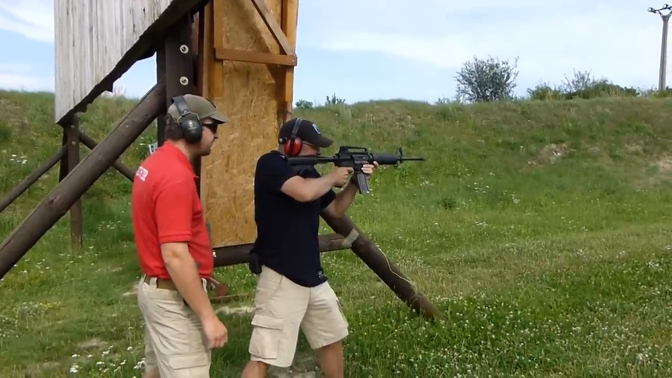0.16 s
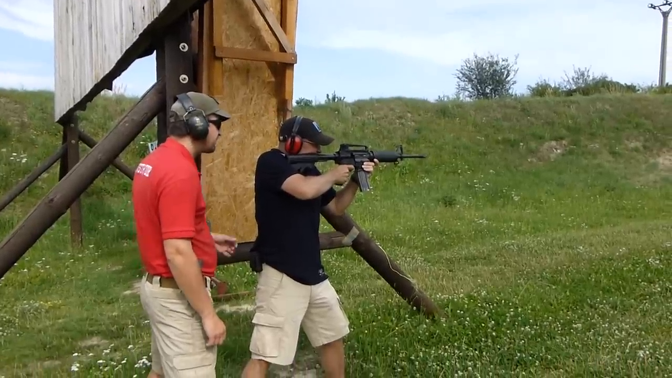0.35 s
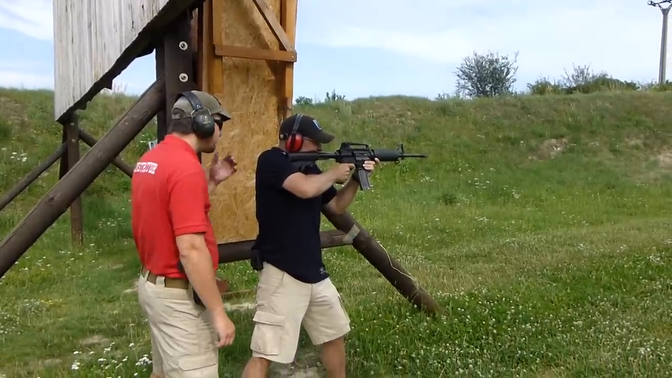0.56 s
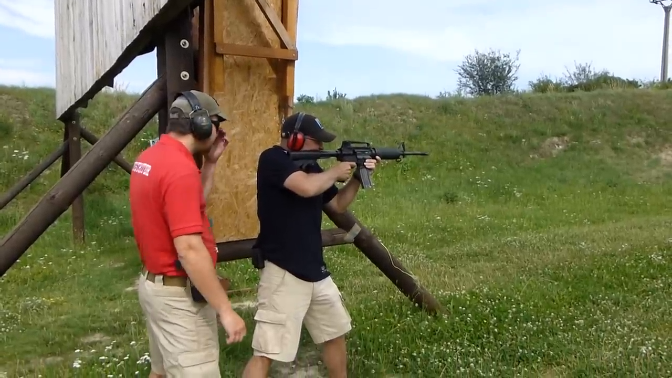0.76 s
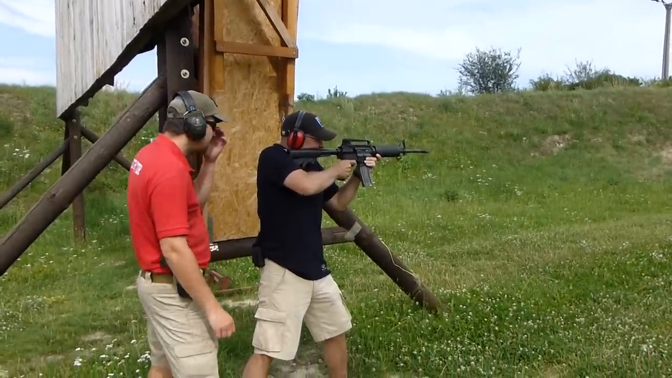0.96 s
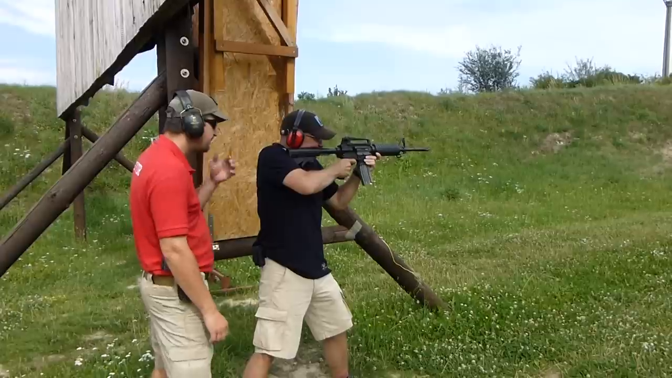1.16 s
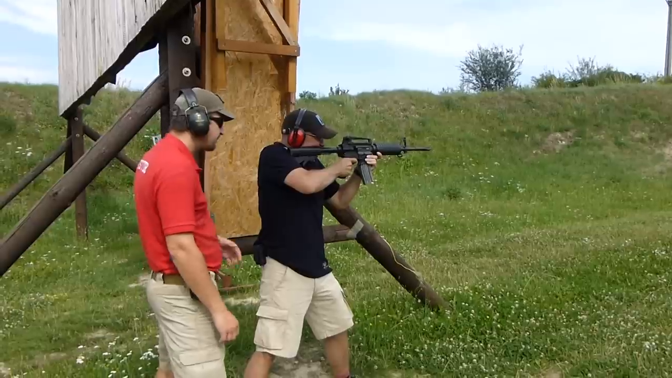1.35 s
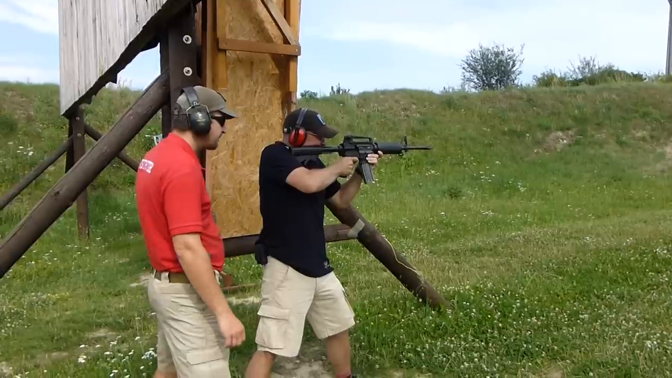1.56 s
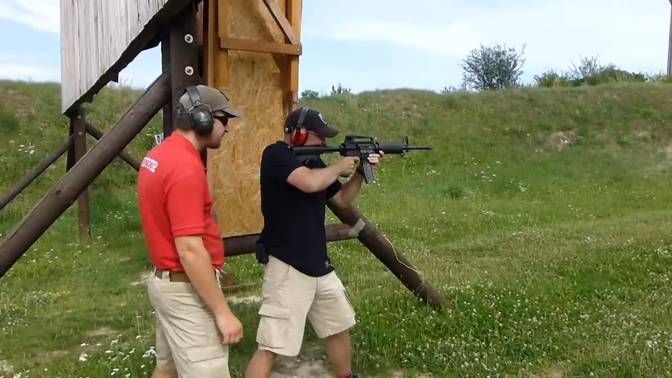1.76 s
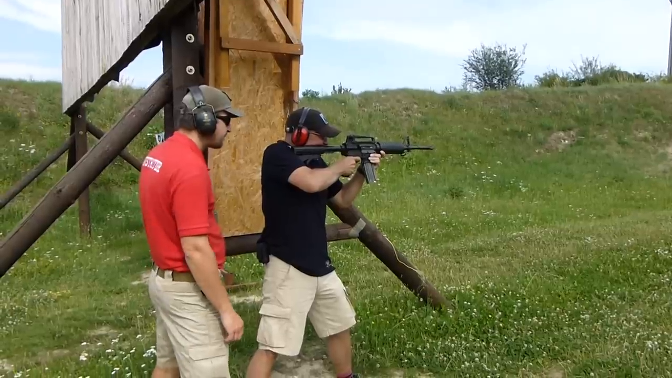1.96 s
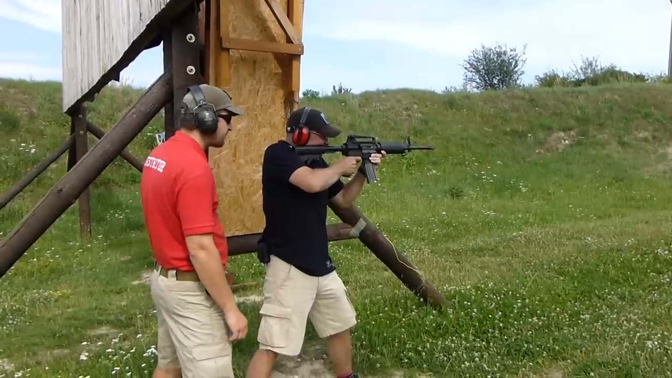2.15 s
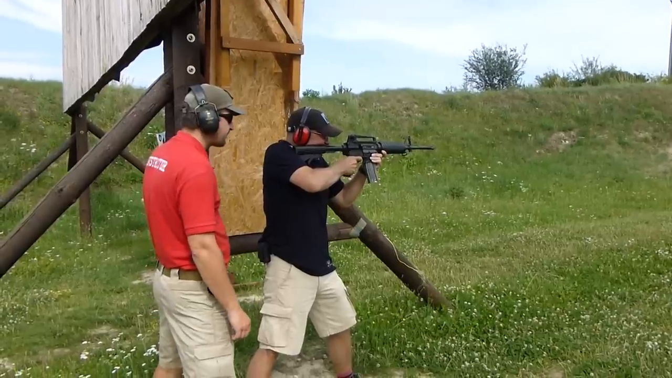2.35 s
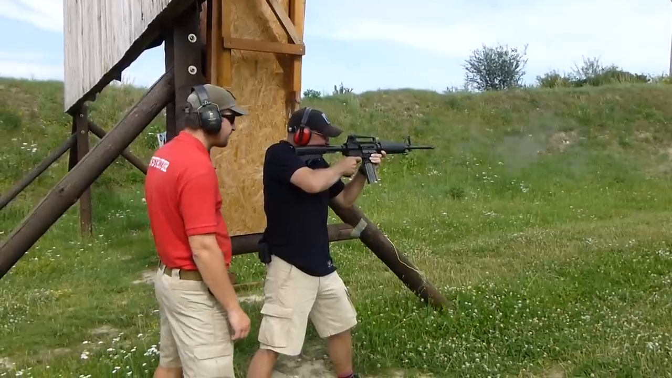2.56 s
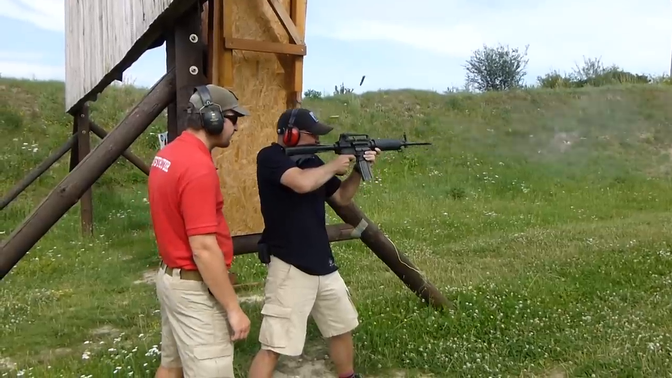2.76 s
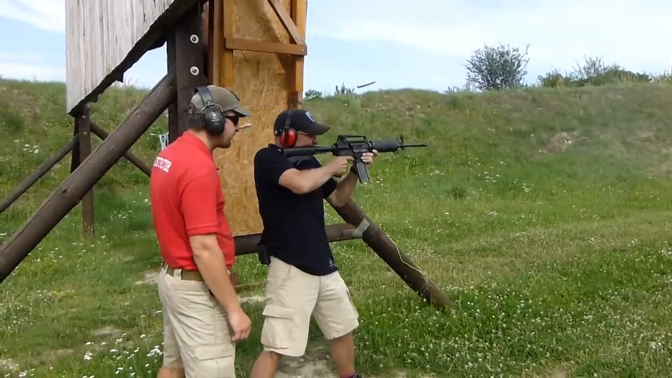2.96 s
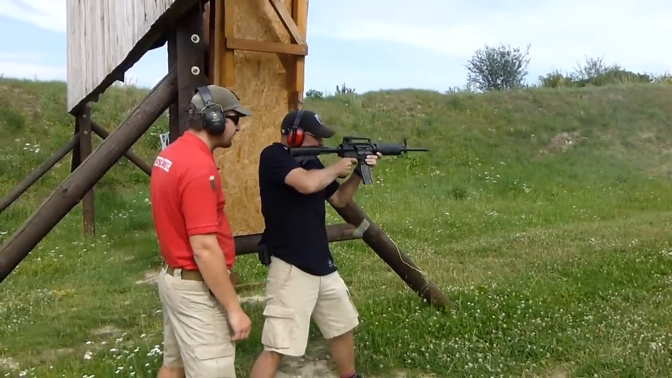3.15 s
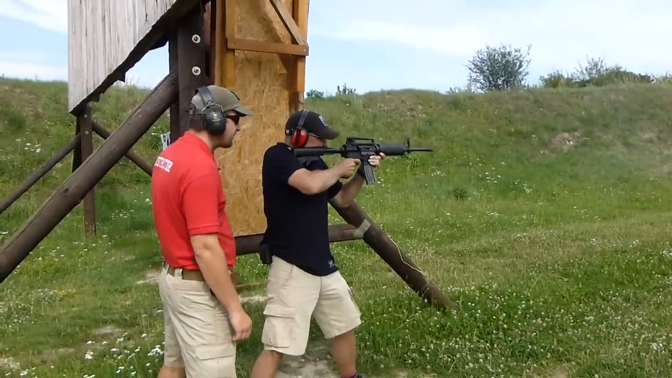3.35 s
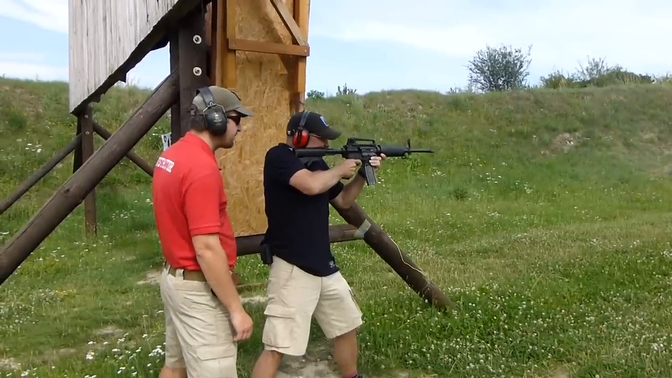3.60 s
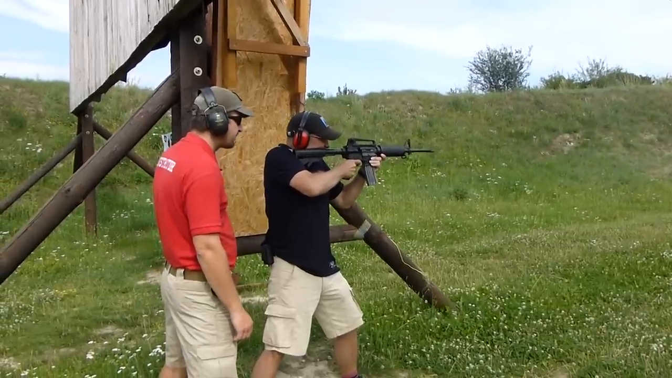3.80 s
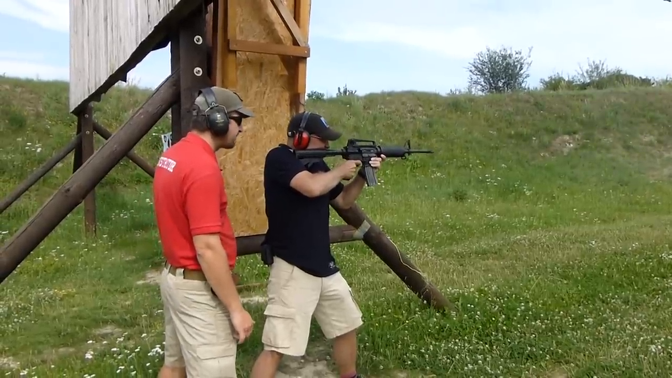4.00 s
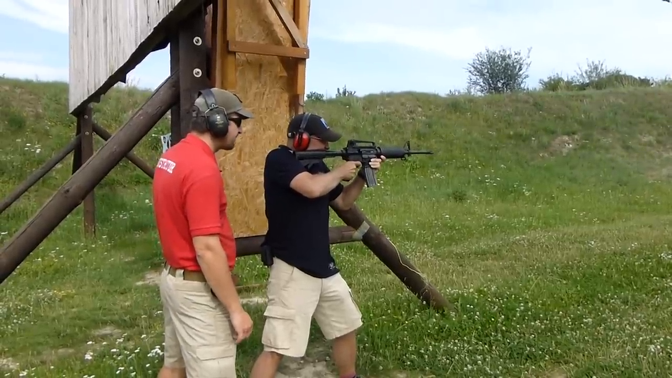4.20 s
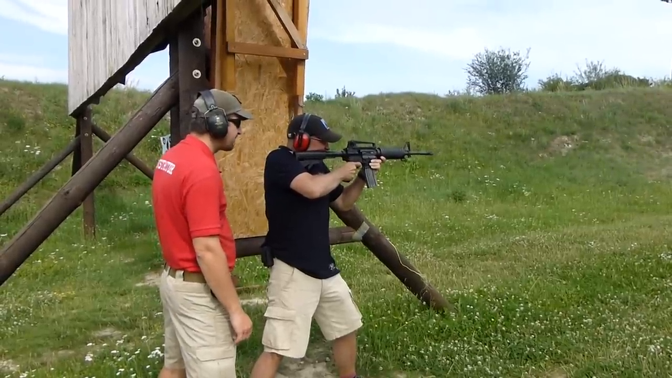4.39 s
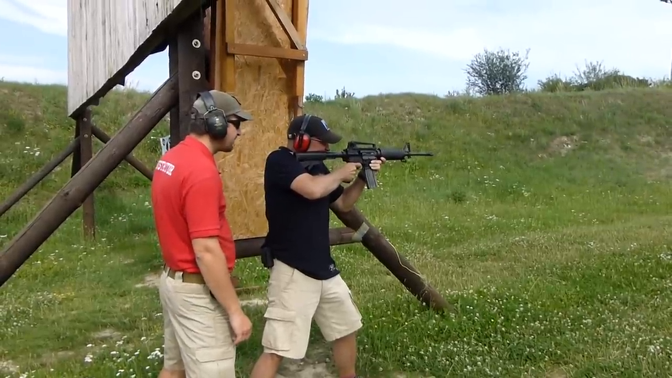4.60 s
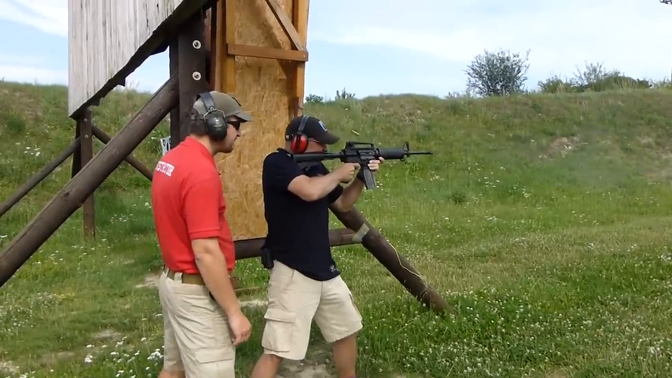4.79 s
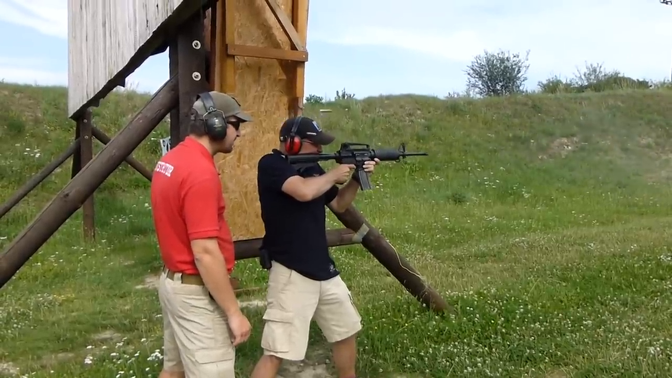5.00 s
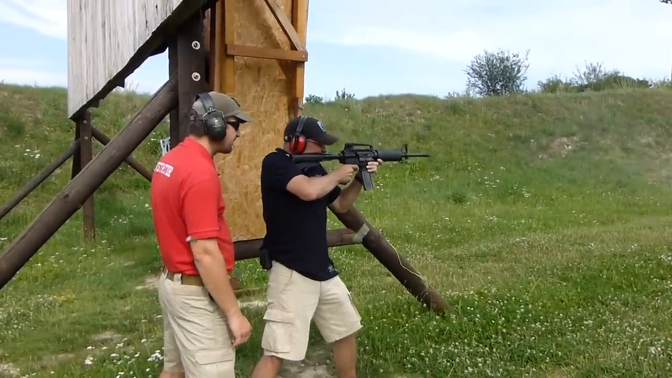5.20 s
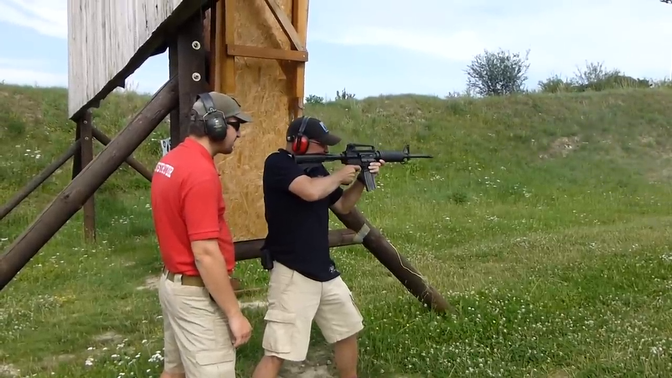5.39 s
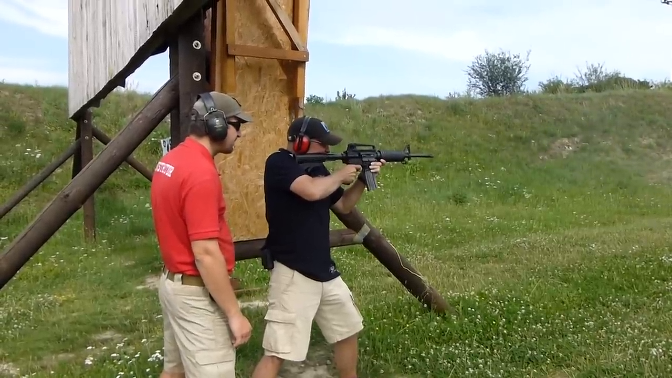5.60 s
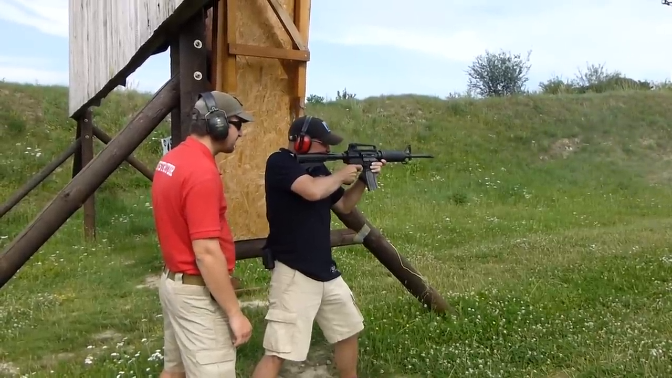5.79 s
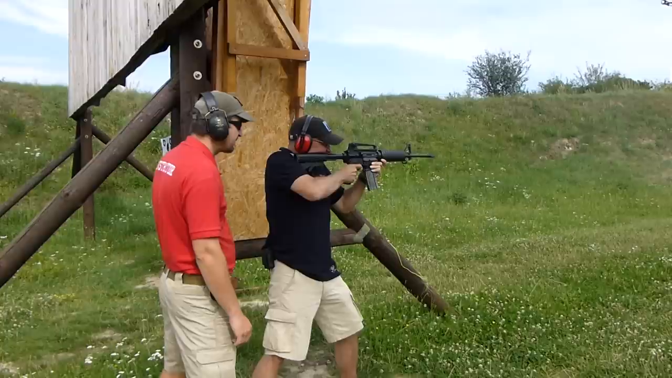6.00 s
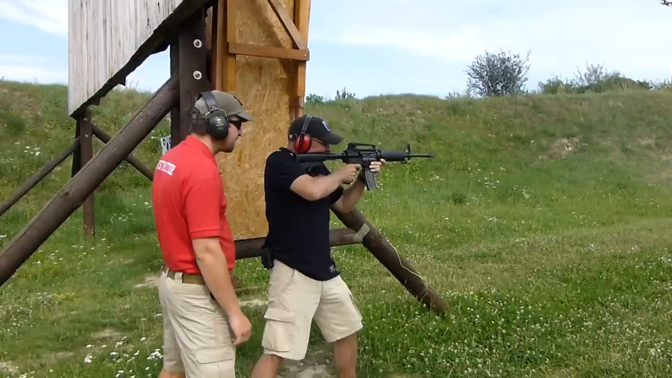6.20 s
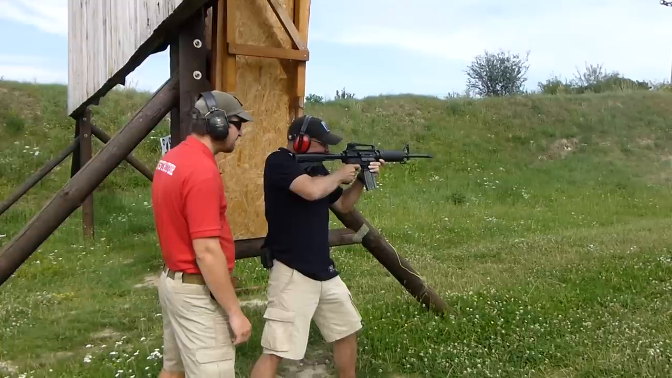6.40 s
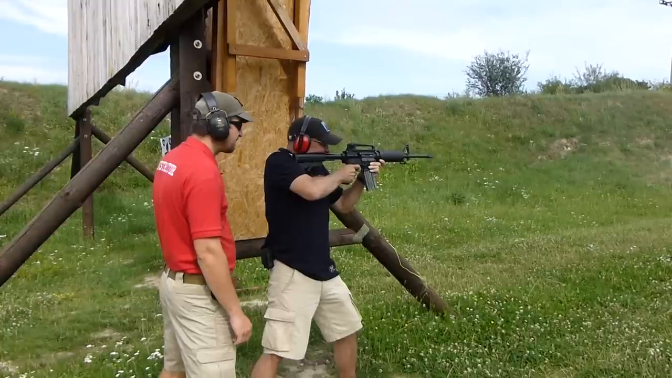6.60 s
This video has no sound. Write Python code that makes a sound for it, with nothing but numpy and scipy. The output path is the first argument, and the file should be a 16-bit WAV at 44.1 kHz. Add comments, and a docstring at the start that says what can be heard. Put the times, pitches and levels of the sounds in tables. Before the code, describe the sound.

A light breeze over grass lies very quietly under an open shooting range, heard close beside a timber shelter. From about 0.4 to 1.7 seconds clothes rustle softly, loose rifle parts tap, and small steel clicks and dull knocks sound, strongest near 1.3. After a still pause, a hammer snap leads at 2.7 into three very loud automatic rifle shots within 0.2 seconds: sharp, slightly flattened cracks, short woody booms, quick slapbacks, then a diffuse roll from distant woods. The bolt clacks after the last. Between 3.55 and 4.1 spent cases tick on the ground with tiny high rings; low bumps touch the microphone. At 4.86 two more shots fire, about 0.1 seconds apart, echoing likewise. Near 5.65 a sharp knock and steel click land with low thumps over the fading, darkening roll, and a soft bump comes at 6.6.

```python
"""Over a breeze in the grass, a shooter beside a timber shelter settles: clothes rustle, loose parts tap, steel clicks.
An automatic rifle fires a burst of three, then of two, its hammer and bolt clacking as filtered noise pulses.
Each shot cracks, booms in the shelter's modes, slaps back from walls and banks and rolls back from distant woods.
After the first burst cases tick and ring on the ground; later, slow swings bump the microphone as parts still knock.
The recorder's gain control ducks under the blasts, and its overload flattens the strongest peaks."""
import sys
import numpy as np
from scipy import signal
from scipy.fft import rfft, irfft
from scipy.io import wavfile
from scipy.ndimage import uniform_filter1d

SR = 44100
rng = np.random.default_rng(int(sys.argv[2]) if len(sys.argv) > 2 else 0)


def master_out(mix):
    """Clip the mix to full scale and print it as 16-bit PCM to the path in sys.argv[1]."""
    frames = np.transpose(np.atleast_2d(mix))
    ceiling = np.clip(frames, -1, 1)
    pcm = np.round(ceiling * 32767).astype(np.int16)
    wavfile.write(sys.argv[1], SR, pcm)


N = 293176
TIME = np.arange(N) / SR

# rounds fired: t/s, relative level/dB, extra crack level/dB
SHOT_TIMES_LEVELS = [(2.687, 2.5, 6.5), (2.7730, 1.5, 5), (2.8659, 5, 4), (4.857, 0.5, 4.5),
                     (4.9503, 3.5, 1.5)]
# colour of the boom that follows the crack: f/Hz, spectral level/dB
BOOM_COLOUR = [(30, -42.5), (70, -29), (130, -13.5), (205, -14), (285, -5), (370, -3), (520, -3.5),
               (850, -6), (1400, -10), (2200, -10.5), (4000, -19), (9000, -38)]
# colour of hard contacts, steel or brass: f/Hz, spectral level/dB
HARD_COLOUR = [(50, -43.5), (200, -17), (1200, -3.5), (2500, -17.5), (4500, 8), (6000, 5.5), (8000, 4.5),
               (11000, 0.5), (16000, -7)]
# left-right correlation of near sound: f/Hz, correlation
NEAR_LIKENESS = [(60, 0.31), (130, 0.99), (290, 0.88), (640, 0.93), (1410, 0.52), (3100, 0.83),
                 (6820, 0.89), (15000, 0.98)]
# lean of echoes and bumps: f/Hz, left minus right level/dB
LEAN_BY_HZ = [(100, -4.5), (380, -3.5), (700, -8), (1300, -1.5), (2400, 0.5), (12000, -2.5)]


def from_db(db):
    """The logarithmic level law: amplitude gain of a level in dB."""
    return 10 ** (np.asarray(db) / 20)


def rms_one(x):
    """Normalisation by mean power: the same sound at rms 1."""
    return x / np.sqrt(np.mean(x ** 2) + 1e-20)


def at_hz(points, hz):
    """Interpolation of a table along a logarithmic frequency axis."""
    f, value = np.transpose(points)
    return np.interp(np.log(np.maximum(hz, 1)), np.log(f), value)


def pan(db):
    """Interchannel level difference: two gains for a left minus right level in dB."""
    return from_db(np.array([[db], [-db]]) / 2)


def fade(t, t60):
    """Exponential decay: 60 dB lost in t60 seconds."""
    return np.exp(-np.log(1000) * t / t60)


def swell(t, rise_s, t60):
    """Build-up and decay of energy: silent before time zero, rising, then dying away."""
    t = np.maximum(t, 0)
    return (1 - np.exp(-t / rise_s)) * fade(t, t60)


def add(out, s, sound):
    """Linear superposition: mix a sound in at a time in seconds."""
    i = round(s * SR)
    out[:, i:i + sound.shape[1]] += sound[:, :N - i]


def noise(colour, likeness, size):
    """Partially correlated stereo noise: independent mid and side mixed by likeness; rms 1."""
    hz = np.arange(size // 2 + 1) * SR / size
    mid, side = rfft(rng.standard_normal((2, size)))
    alike = np.clip(at_hz(likeness, hz), -1, 1)
    both = np.sqrt(1 + alike) * mid + np.sqrt(1 - alike) * side * [[1], [-1]]
    return rms_one(irfft(both * from_db(at_hz(colour, hz)), size))


def flicker(depth_db, size, count=440):
    """Slow amplitude modulation: smoothing over about 10 ms makes a randomly wavering gain."""
    slow = uniform_filter1d(uniform_filter1d(rng.standard_normal(size), count), count)
    return rms_one(from_db(depth_db * rms_one(slow)))


def causal(gain):
    """Minimum phase: the folded cepstrum gives a filter of this gain that sounds nothing early."""
    cepstrum = irfft(np.log(gain))
    half = len(cepstrum) // 2
    return np.exp(rfft(np.r_[cepstrum[0], 2 * cepstrum[1:half], np.zeros(half)]))


def puff(colour, t60, rise_s, size=16384, count=160):
    """Dense superposition of wavefronts: a noise pulse, its energy evened out under the colour."""
    right_lag_ms = 0.0044
    t, hz = TIME[:size], np.arange(size // 2 + 1) * SR / size
    envelope = swell(t, rise_s, t60)
    spectrum = rfft(noise([(1, 0)], NEAR_LIKENESS, size) * envelope)
    power = np.mean(np.abs(spectrum) ** 2, axis=0)
    uneven = np.sqrt(uniform_filter1d(power, count) + 1e-12)
    lag = np.exp(-2j * np.pi * hz * right_lag_ms / 1000 * np.array([[0], [1]]))
    shaping = causal(from_db(at_hz(colour, hz)) / uneven)
    coloured = irfft(spectrum * lag * shaping)
    return rms_one(coloured) * np.sqrt(np.mean(envelope ** 2))


def ring(hz, t60, rise_s, lag_s=0, size=16384):
    """Damped resonance: a sine builds up and rings out, reaching the left side lag_s later."""
    t = np.maximum(TIME[:size] - np.array([[lag_s], [0]]), 0)
    return np.sin(2 * np.pi * hz * t) * swell(t, rise_s, t60)


def contact(colour, t60):
    """Impulsive excitation: a hard touch starts almost at once."""
    return puff(colour, t60, rise_s=.0002)


def breeze():
    """Broadband flow noise: the breeze in the grass as steady coloured noise."""
    # colour of the breeze: f/Hz, spectral level/dB
    breeze_colour = [(15, -46.5), (25, -17), (71, -20.5), (107, -11), (156, -11.5), (209, -8.5),
                     (313, -10.5), (340, -6), (410, -11), (523, -11), (722, -10.5), (1050, -11),
                     (1900, -19.5), (6730, -23), (15500, -32.5)]
    # left-right correlation of ambient sound: f/Hz, correlation
    ambient_likeness = [(60, 0.42), (130, 0.64), (290, 0.59), (640, -0.42), (1410, -0.57), (3100, -0.7),
                        (6820, 0.63), (15000, 0.26)]
    return from_db(-55) * pan(-1.1) * noise(breeze_colour, ambient_likeness, N)


def knock(db, hz, t60):
    """Modal excitation: a damped contact sets the rifle's body modes ringing with random signs."""
    # colour of a dull knock: multiple of the body pitch, spectral level/dB
    knock_colour = [(.12, -42), (.55, 2.5), (.85, 23.5), (1.15, 21), (1.9, 0), (2.6, 5), (4.2, 4), (7, -8),
                    (15, -26)]
    # modes of the rifle's body: f/Hz, relative level/dB, t60/s
    body_modes = [(815, -7, 0.06), (1440, 1, 0.036), (1970, -6, 0.037), (2950, -28, 0.07),
                  (3950, -15, 0.086)]
    colour = [(hz * multiple, level) for multiple, level in knock_colour]
    signs = rng.choice([-1, 1], len(body_modes))
    body = 0
    for sign, (mode_hz, level, mode_t60) in zip(signs, body_modes):
        body = body + sign * from_db(level) * ring(mode_hz, mode_t60, rise_s=0.00039)
    # a brief touch gives the body less energy
    push = from_db(-6) * np.sqrt(min(t60 / body_modes[0][2], 1))
    return from_db(db) * pan(-1.1) * (contact(colour, t60) + push * body)


def shouldering():
    """Friction and random impacts: clothes rustle, a sleeve brushes the stock, loose parts tap."""
    # colour of the rustling clothes: f/Hz, spectral level/dB
    rustle_colour = [(100, -14), (500, 1.5), (850, 0), (1500, -1.5), (2200, -9.5), (4500, -10), (8000, -15),
                     (15000, -22)]
    start_s, end_s, fade_s = 0.71, 1.385, 0.4  # fades lie outside start and end
    rustle_db = -57
    brush_s, brush_width_s, brush_db = 1.134, 0.025, -50.5
    taps_per_s, tap_db, tap_spread_db, tap_hz, tap_t60_s = 10, -43.5, 8, 1100, 0.016

    inside_s = np.minimum(TIME - start_s, end_s - TIME)
    motion = np.clip(1 + inside_s / fade_s, 0, 1) ** 2
    brush = np.exp(-((TIME - brush_s) / brush_width_s) ** 2)
    level = from_db(rustle_db) * motion + from_db(brush_db) * brush
    out = level * noise(rustle_colour, NEAR_LIKENESS, N) * flicker(depth_db=3.5, size=N)

    starts = np.arange(start_s - fade_s / 2, end_s, 1 / taps_per_s)
    variations = rng.uniform(-1.1, 1, (len(starts), 3))
    for s, (late, strength, pitch) in zip(starts, variations):
        level_db = tap_db + tap_spread_db * strength
        tap = knock(level_db, tap_hz * 2 ** (pitch / 2), tap_t60_s)
        add(out, s + .5 * late / taps_per_s, tap)
    return out


def steel(db, t60):
    """Impact of stiff bodies: steel on steel gives a bright click."""
    return from_db(db) * pan(-0.48) * contact(HARD_COLOUR, t60)


def handling():
    """Impact excitation: dull knocks of stock and grip, steel clicks of sling and safety catch."""
    # knocks: t/s, relative level/dB, body f/Hz, t60/s
    knock_events = [(.745, -47.5, 810, 0.1), (0.768, -41, 696, 0.044), (0.785, -34, 1390, 0.025),
                    (0.9958, -39, 1140, 0.02), (1.136, -43.5, 900, 0.077), (1.239, -33.5, 840, 0.15),
                    (1.256, -36.5, 1460, 0.05), (1.2675, -32, 625, 0.036), (1.295, -32.5, 790, 0.035),
                    (1.3333, -28.5, 1130, 0.011), (3.560, -22, 1190, 0.036), (5.656, -25, 790, 0.021),
                    (5.687, -8, 1180, 0.0093), (6.581, -45, 384.4, 0.024)]
    # clicks: t/s, relative level/dB, t60/s
    click_events = [(0.569, -48.5, 0.032), (0.912, -42.5, 0.017), (1.137, -34.5, 0.027), (1.242, -47, 0.15),
                    (5.651, -36, 0.079), (5.6854, -11, 0.017)]
    out = np.zeros((2, N))
    for s, db, hz, t60 in knock_events:
        add(out, s, knock(db, hz, t60))
    for s, db, t60 in click_events:
        add(out, s, steel(db, t60))
    return out


def action():
    """Sequential impacts: hammer before a burst, bolt before further rounds and after the last."""
    cycle_s = 0.08
    hammer_lead_s, hammer_db, hammer_t60_s = 0.0086, -5, 0.039
    bolt_lead_s, bolt_db, bolt_t60_s = 0.0091, -15.5, 0.09
    close_db, close_t60_s = -12.5, 0.029
    out = np.zeros((2, N))
    times = np.array(SHOT_TIMES_LEVELS)[:, 0]
    # a gap of more than two cycles parts the bursts
    pause = np.diff(np.r_[-np.inf, times, np.inf]) > 2 * cycle_s
    for s, first, last in zip(times, pause, pause[1:]):
        if first:
            add(out, s - hammer_lead_s, steel(hammer_db, hammer_t60_s))
        else:
            add(out, s - bolt_lead_s, steel(bolt_db, bolt_t60_s))
        if last:
            add(out, s + cycle_s, steel(close_db, close_t60_s))
    return out


def scatter(envelope, colour, true_at_s, air_db):
    """Diffuse scattering with air absorption: loss is air_db per second and kHz, exact colour at true_at_s."""
    # left-right correlation of far sound: f/Hz, correlation
    far_likeness = [(60, 0.6), (130, 1), (290, 0.93), (640, 1), (1410, 0.37), (3100, 0.77), (6820, 0.74),
                    (15000, 0.36)]
    size = len(envelope)
    t, hz = TIME[:size], np.arange(size // 2 + 1) * SR / size
    spectrum, out = rfft(noise(colour, far_likeness, size)), 0
    edges = np.r_[30, np.geomspace(300, 17000, 24)]
    for low, high in zip(edges, edges[1:]):
        centre = np.sqrt(low * high)
        khz = centre / 1000
        loss_db = np.maximum(air_db * khz * (t - true_at_s), -2)  # early boost at most 2 dB
        band = irfft(spectrum * ((hz >= low) & (hz < high)), size)
        out = out + band * from_db(-loss_db) * pan(at_hz(LEAN_BY_HZ, centre))
    return out * envelope


def tails(size=131072):
    """Propagation delay and diffusion: grass, banks and woods answer later and longer with distance."""
    # colour of the scatter from grass and banks: f/Hz, spectral level/dB
    near_colour = [(50, -18.5), (150, -6.5), (400, -0.5), (700, 2.5), (1500, -6), (2600, -7.5),
                   (5000, -6.5), (9000, -9.5), (12000, -18), (15000, -25)]
    # colour of the roll from the woods: f/Hz, spectral level/dB
    far_colour = [(59, -49.5), (100, -19), (200, -20), (330, -13.5), (420, -6), (720, -1.5), (1370, -6.5),
                  (2000, -16), (2350, -11), (3080, -21.5), (4080, -18), (9000, -36), (11700, -80)]
    t = TIME[:size]
    grass = from_db(-16.5) * swell(t, rise_s=0.0057, t60=0.58)
    banks = from_db(-30.5) * swell(t - 0.17, rise_s=0.19, t60=1.61)
    woods = from_db(-32) * swell(t - 0.68, rise_s=0.41, t60=7.4)
    near = scatter(np.hypot(grass, banks), near_colour, true_at_s=0.046, air_db=3.0)
    far = scatter(woods, far_colour, true_at_s=0.96, air_db=12.5)
    return near * flicker(depth_db=1.5, size=size) + far * flicker(depth_db=0.92, size=size)


def range_response():
    """Impulse response of the range: boom, shelter modes, single echoes and tails serve every round."""
    # resonances of the shelter: f/Hz, relative level/dB, t60/s
    shelter_modes = [(289.6, -6, 0.062), (453, -17, 0.19), (542.4, -12.5, 0.092), (609.5, -16.5, 0.14),
                     (740, -13.5, 0.18), (842, -10.5, 0.077), (985, -28, 0.083), (1060, -13, 0.13),
                     (1240, -18, 0.13), (1383, -13, 0.079), (1830, -24.5, 0.078), (2895, -17.5, 0.072)]
    # single echoes off walls and banks: delay t/s, relative level/dB, centre f/Hz, t60/s
    echo_paths = [(0.069, -11.5, 750, 0.037), (.1065, -16, 1000, 0.04), (.1475, -13.5, 683.6, 0.031),
                  (0.151, -10, 334.6, 0.027), (0.334, -27, 550, 0.043), (0.333, -28.5, 2300, .04),
                  (0.395, -31, 1266, 0.086), (.682, -37, 1300, 0.11)]
    out = np.zeros((2, N))
    add(out, .002, from_db(4.5) * pan(-0.11) * puff(BOOM_COLOUR, t60=0.065, rise_s=0.0018))
    for k, (hz, db, t60) in enumerate(shelter_modes):
        mode = ring(hz, t60, rise_s=0.0025, lag_s=0.00024)
        add(out, .004, (-1) ** k * from_db(db + 7.0) * pan(-5.0) * mode)
    for delay, db, hz, t60 in echo_paths:
        colour = [(hz / 10, -28), (hz / 2, -4), (hz, 0), (hz * 2, -8), (hz * 5, -24), (hz * 12, -50)]
        add(out, delay, from_db(db) * pan(-0.38) * puff(colour, t60, rise_s=0.002))
    add(out, 0, tails())
    return out


def gunfire():
    """Source and response: each round's own turbulent crack and gas puff set off the whole range."""
    # colour of the muzzle crack: f/Hz, spectral level/dB
    crack_colour = [(50, -52), (200, -17), (500, -7), (950, -1.5), (1700, -4), (2800, -1), (4500, 1.5),
                    (7000, 2), (10000, 0.5), (13000, -4), (16000, -12)]
    out, response = np.zeros((2, N)), range_response()
    for s, db, crack_db in SHOT_TIMES_LEVELS:
        crack = puff(crack_colour, t60=0.039, rise_s=0.00027)
        add(out, s, from_db(db + crack_db + 3.5) * pan(-0.6) * crack)
        gas = puff(BOOM_COLOUR, t60=0.037, rise_s=0.00067)
        add(out, s, from_db(db) * pan(-2.8) * gas)
        add(out, s, from_db(db) * response)
    return out


def cases():
    """Impact and resonance: a case ticks on the ground and its thin brass mouth rings very high."""
    # landings: t/s, relative tick level/dB, ring level/dB
    landings = [(3.557, -27, -62), (3.668, -27, -68), (3.95, -32, -70), (3.9918, -21, -44),
                (4.1119, -26, -50)]
    out = np.zeros((2, N))
    for s, db, ring_db in landings:
        tick = from_db(db - 8.5) * contact(HARD_COLOUR, t60=0.01)
        mouth = from_db(ring_db) * ring(15740, t60=0.24, rise_s=.0003)
        add(out, s, pan(-1.7) * (tick + mouth))
    return out


def bumps():
    """Pressure oscillation at the microphone: air swings it for a slow cycle or two in a Gaussian envelope."""
    # bumps: t/s at the middle, relative level/dB, f/Hz
    bump_events = [(4.212, -33, 140), (4.616, -40.5, 140), (5.473, -37, 151.2), (5.549, -32, 111.3),
                   (5.595, -28, 165.3), (5.616, -30, 185), (5.654, -30.5, 134.1), (5.689, -30, 156),
                   (6.586, -23.5, 236), (6.598, -32, 197.4)]
    half_cycles = 0.79  # from the middle to 1/e
    out = np.zeros((2, N))
    t = TIME[:4096] - TIME[2048]
    for s, db, hz in bump_events:
        swing = np.cos(2 * np.pi * hz * t) * np.exp(-(hz * t / half_cycles) ** 2)
        add(out, s + t[0], from_db(db) * pan(at_hz(LEAN_BY_HZ, hz)) * swing)
    return out


def nearby(x):
    """Comb filtering by close reflections; the open shelter holds no deep bass."""
    # posts, wall and ground beside the microphone: delay t/s, relative level/dB
    close_paths = [(.00075, -27), (.0022, -48.5), (.0047, -23.5), (0.0146, -15.5)]
    out = x.copy()
    for delay, db in close_paths:
        add(out, delay, from_db(db) * x)
    return signal.sosfilt(signal.butter(2, 70, "high", fs=SR, output="sos"), out)


def scene():
    """Superposition of sources: rifle and shooter through the close paths, the rest direct."""
    around = breeze() + cases() + bumps()
    rifle = shouldering() + handling() + action() + gunfire()
    return around + from_db(-2.5) * nearby(rifle)


def released(cut_db, db_per_s):
    """Peak holding with linear release: a gain cut recovers at a steady rate in dB per second."""
    return np.maximum.accumulate(cut_db + db_per_s * TIME) - db_per_s * TIME


def gain_control(x, limit_db, attack_s, quick_db, held_db, slow_db):
    """Level-dependent gain: cuts return at quick_db per s, their last held_db at slow_db per s."""
    power = uniform_filter1d(np.mean(x ** 2, axis=0), size=88)  # about 2 ms
    over = np.maximum(10 * np.log10(np.maximum(power, 1e-12)) - limit_db, 0)
    quick = released(over, quick_db)
    slow = released(np.minimum(over, held_db), slow_db)
    cut = np.maximum(quick, slow)
    r = np.exp(-1 / (attack_s * SR))
    return x * from_db(-signal.lfilter([1 - r], [1, -r], cut))


def record(dry):
    """Compression, saturation and band limiting: gain control, soft overload, then a steep top cut."""
    level = gain_control(dry, limit_db=-10.5, attack_s=0.0025, quick_db=60.5, held_db=7.5, slow_db=3.0)
    overloaded = 0.92 * np.tanh(level / 0.89)
    top_cut = signal.ellip(10, .2, 70, 15700, fs=SR, output="sos")  # passband edge in Hz
    return signal.sosfilt(top_cut, overloaded)


dry = scene()
out = record(dry)
master_out(out)
```